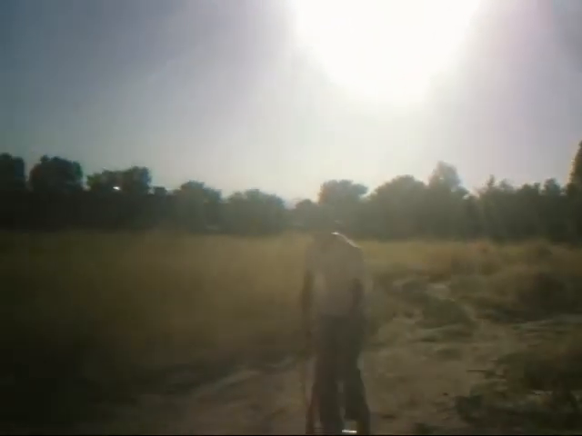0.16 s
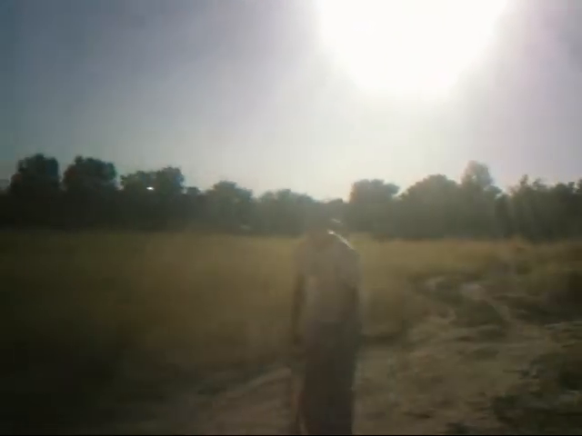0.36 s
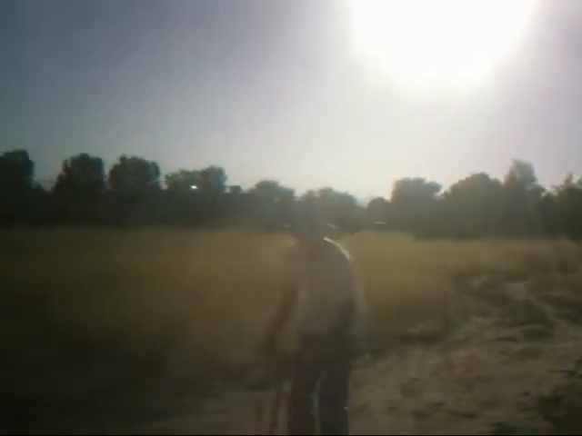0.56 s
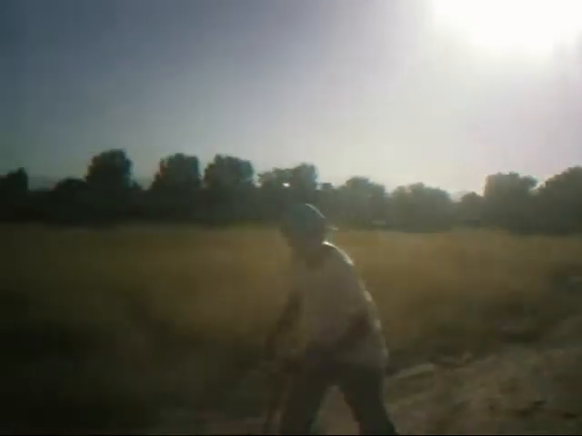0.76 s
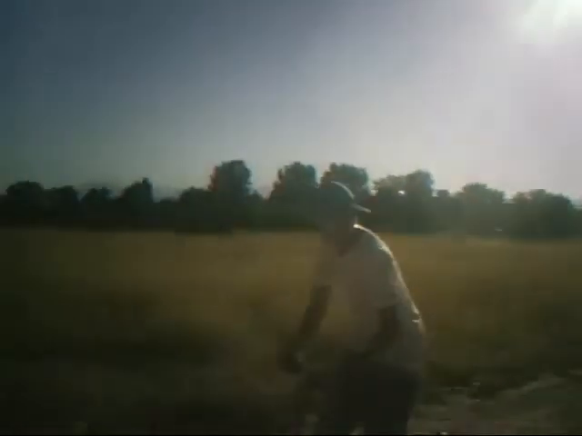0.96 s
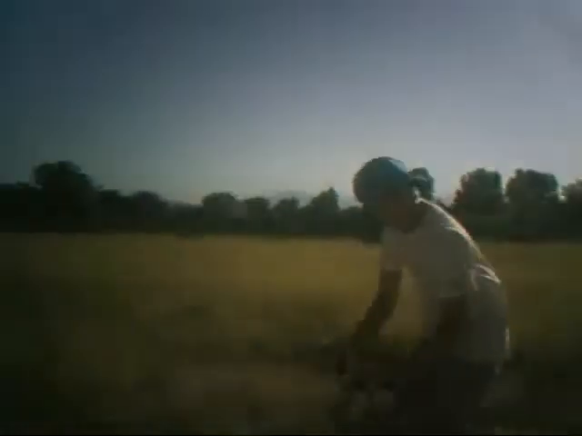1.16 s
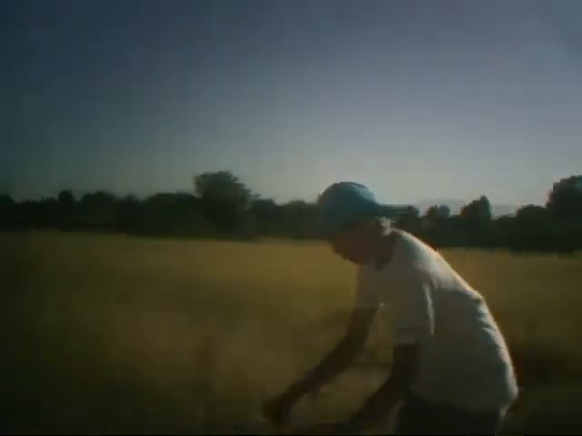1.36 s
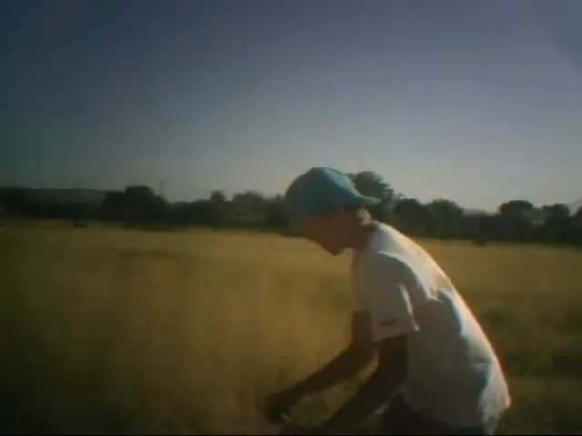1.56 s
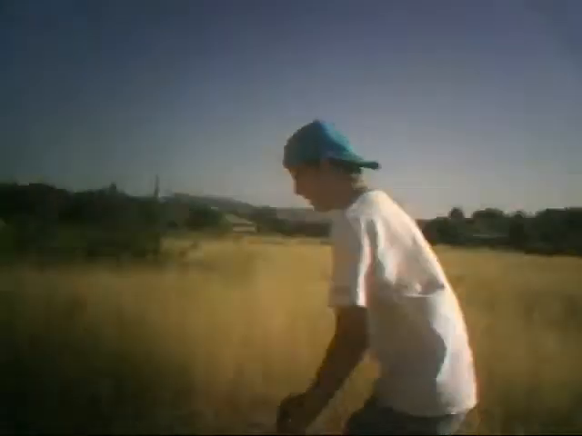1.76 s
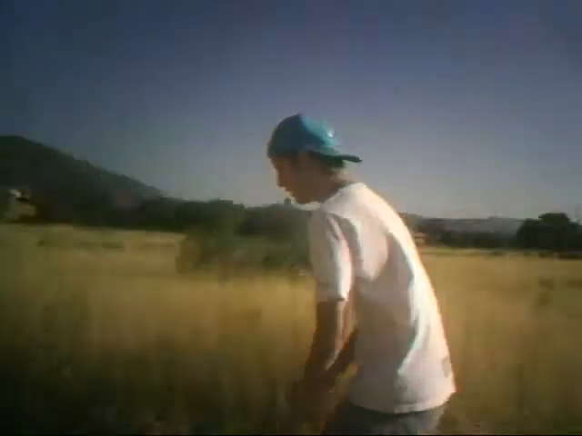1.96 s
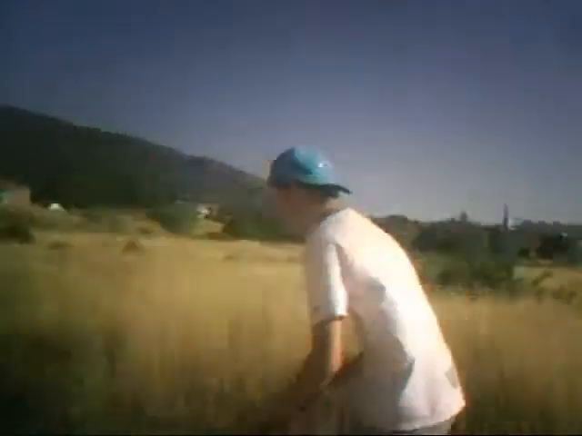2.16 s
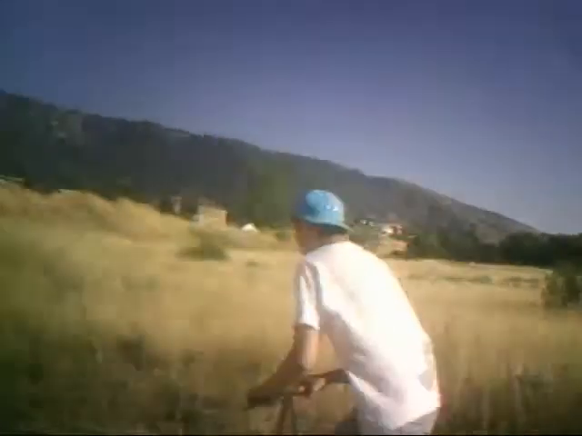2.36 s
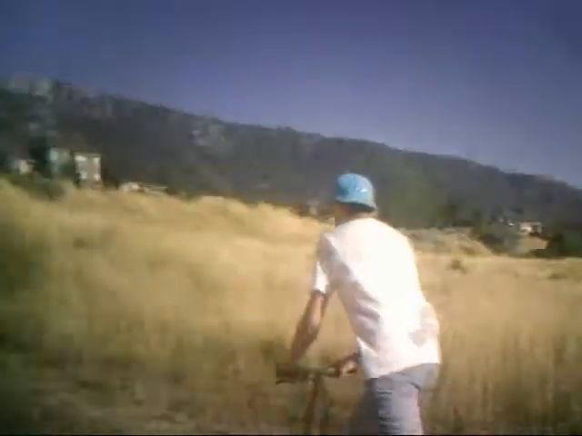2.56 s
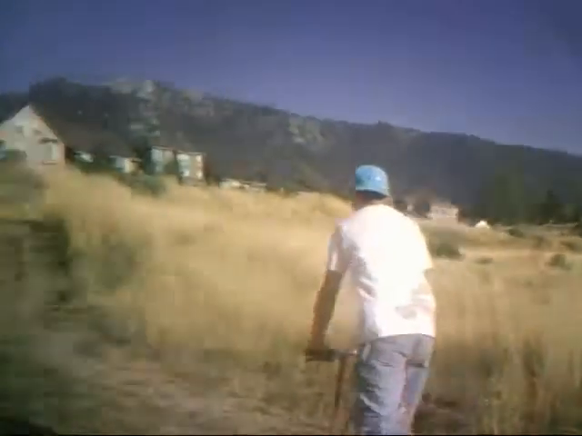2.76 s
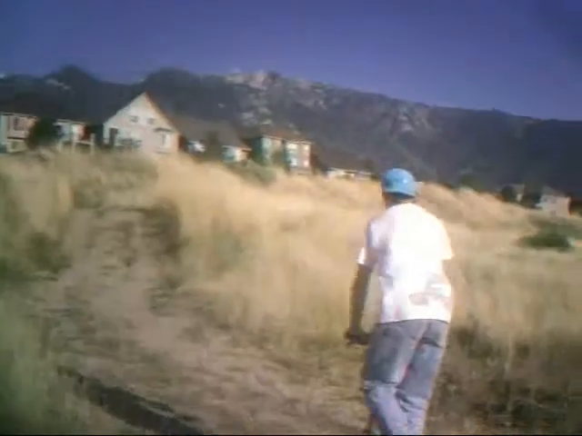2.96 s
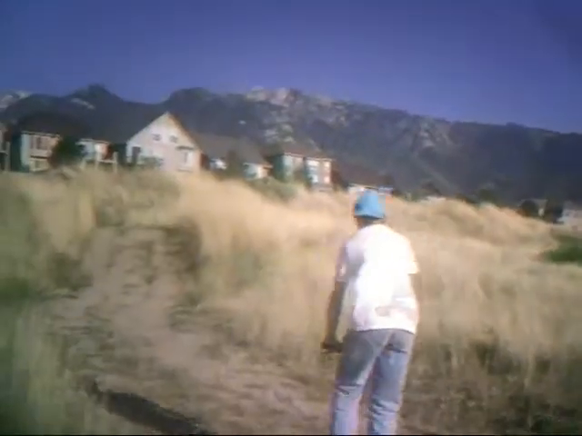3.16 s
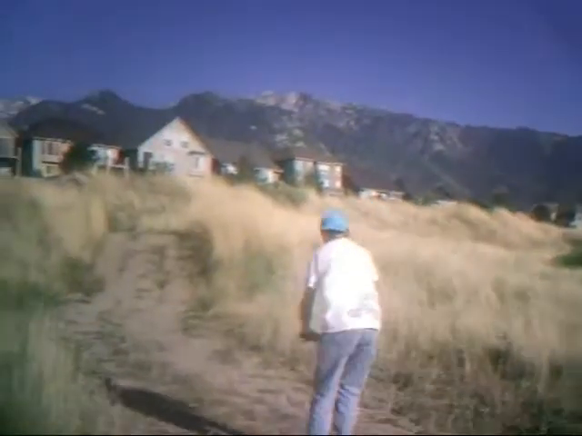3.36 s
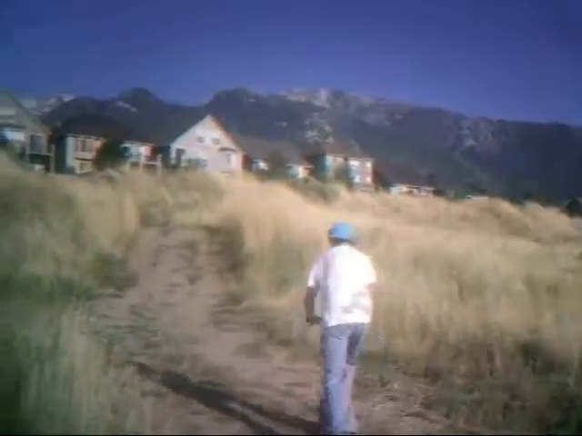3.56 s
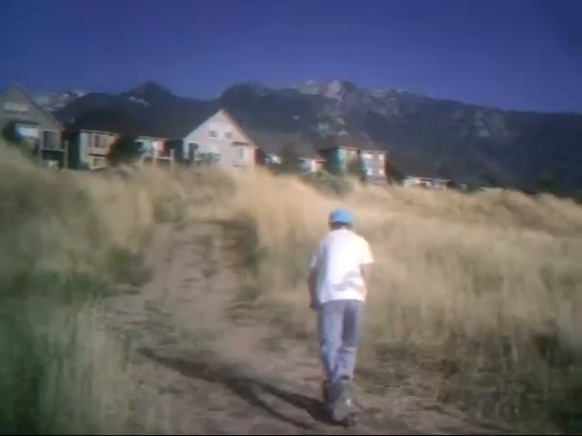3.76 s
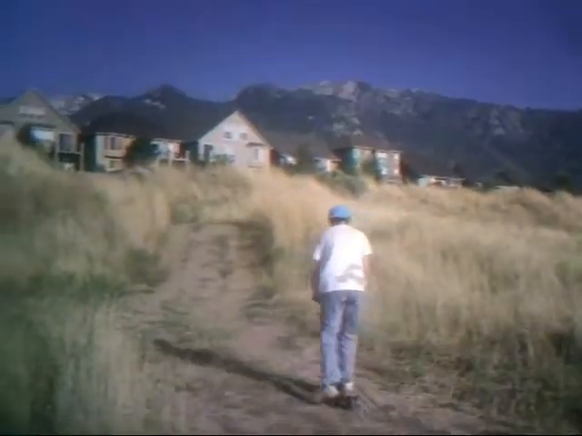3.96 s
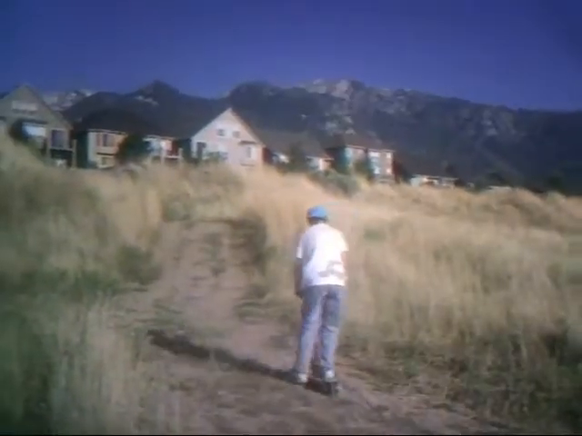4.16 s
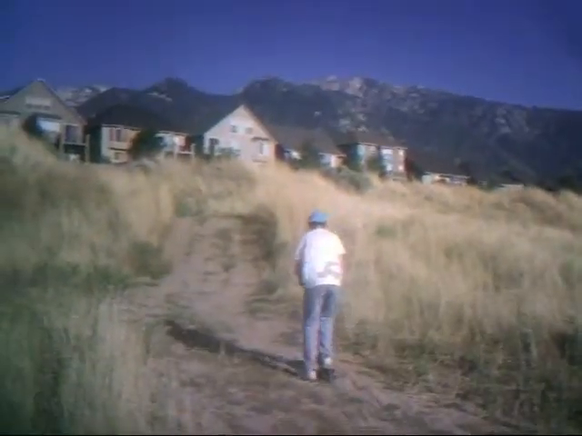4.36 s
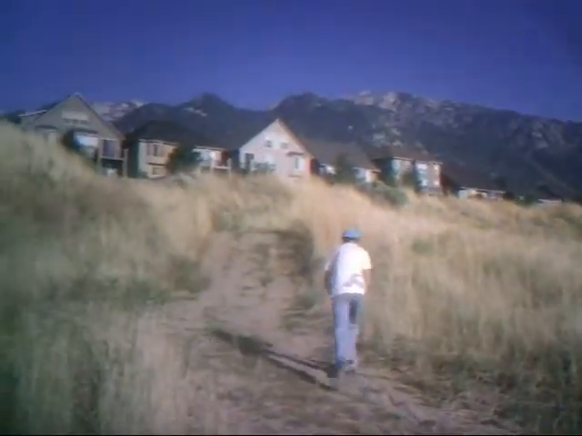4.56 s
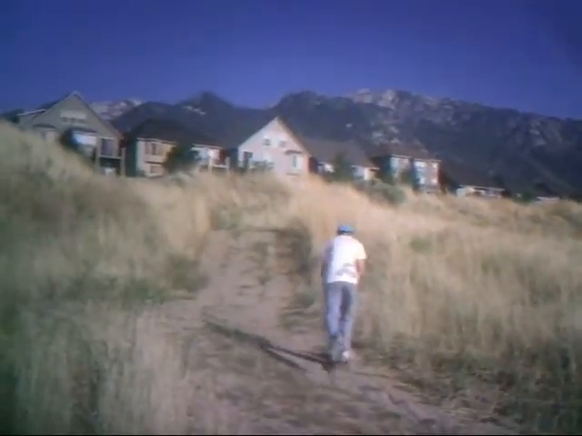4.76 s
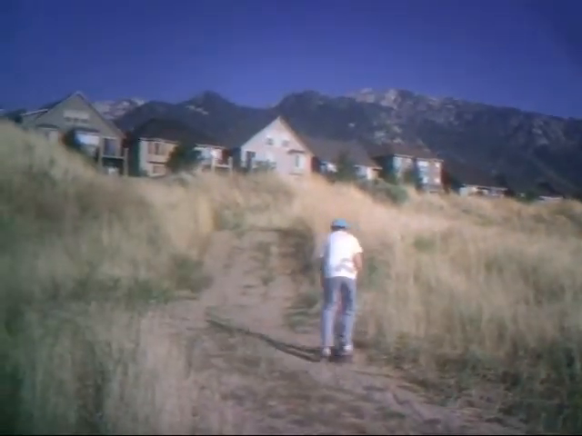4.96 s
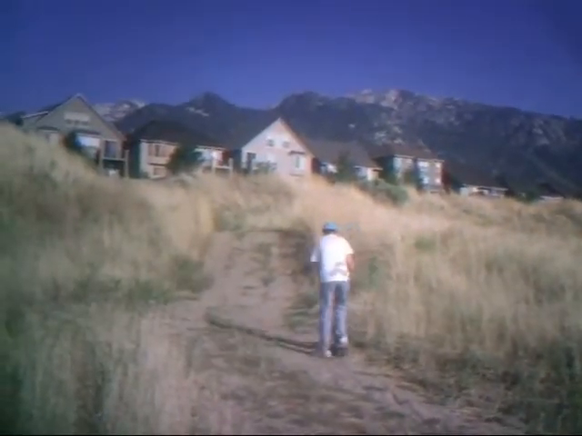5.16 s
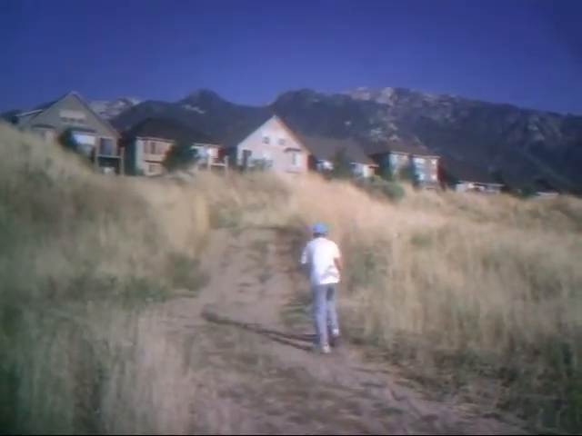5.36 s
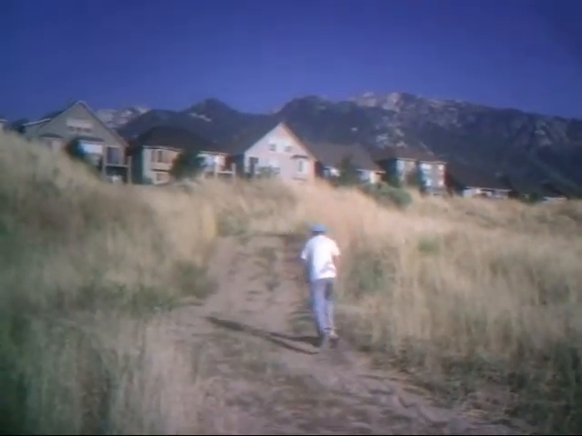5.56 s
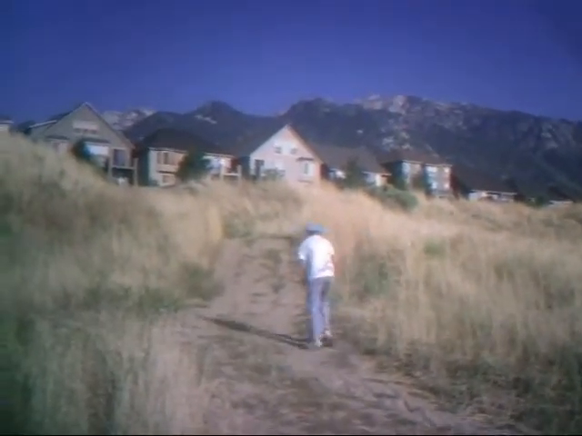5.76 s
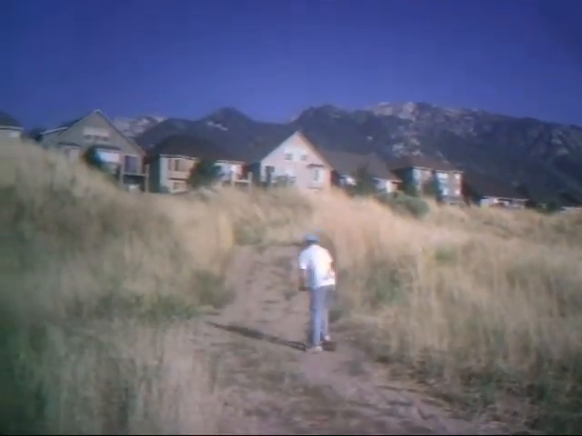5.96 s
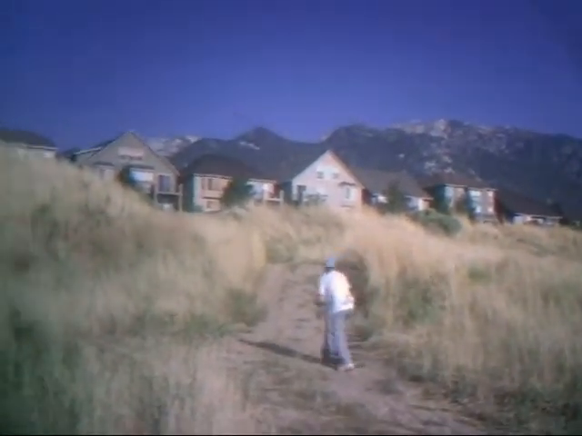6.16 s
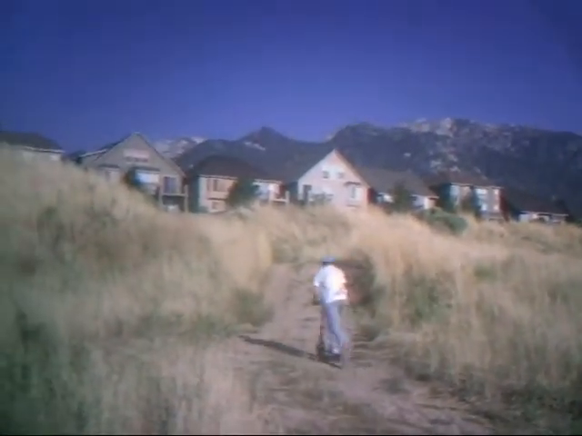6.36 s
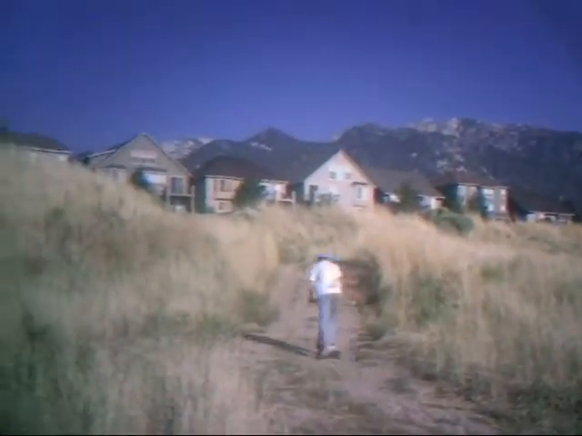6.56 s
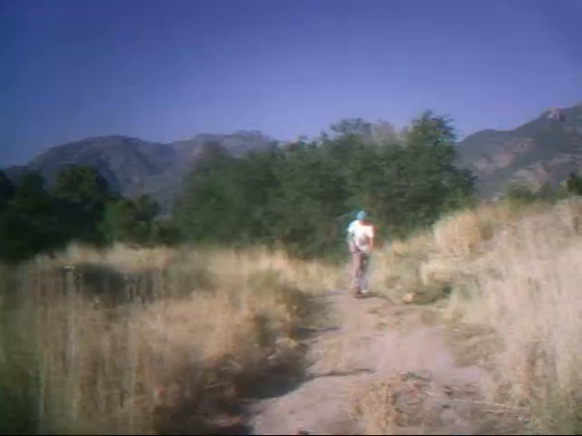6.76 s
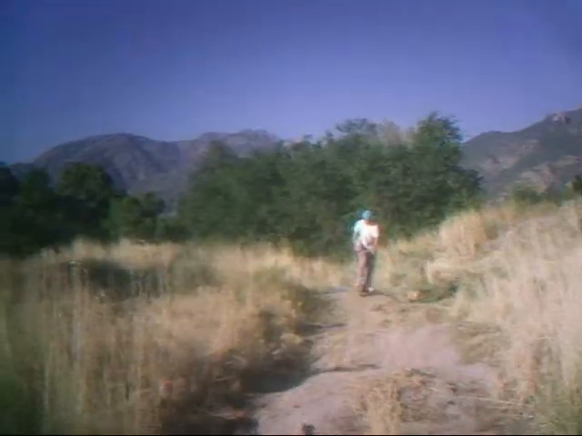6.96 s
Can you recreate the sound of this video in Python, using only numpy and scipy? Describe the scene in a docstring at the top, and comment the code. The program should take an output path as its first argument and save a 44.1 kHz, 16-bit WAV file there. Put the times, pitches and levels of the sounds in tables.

```python
"""A motor's hum comes near with wheel noise: a small electric scooter passes on dirt and labours up a slope.
The hum is a sum of harmonics of a sagging turning rate; filtered random impacts drum on deck and frame and
crunch grit; ruts excite decaying modes and chatter; filtered noise gives tyre drone, rumble and wind.
A coarse sample-and-hold roughens it all; near the end the ride cuts out, leaving hiss,
then a pop and a quiet field."""
import sys
import numpy as np
from scipy import signal
from scipy.fft import rfft, irfft
from scipy.io import wavfile
from scipy.ndimage import map_coordinates

SR = 44100
rng = np.random.default_rng(int(sys.argv[2]) if len(sys.argv) > 2 else 0)


def wav_out(sig):
    """Save sig, one row per channel (or a flat mono array), as 16-bit PCM at SR to the path in sys.argv[1]."""
    wavfile.write(sys.argv[1], SR, np.round(np.clip(np.atleast_2d(sig).T, -1, 1) * 32767).astype(np.int16))


N = 308700
TIME = np.arange(N) / SR

# common level of motor hum and tyre drone: t/s, level/dB
DRIVE_LEVEL = [(0, -6.5), (1.2, -.5), (2.9, 1.5), (4.7, 0), (6, -4.5), (6.7, -10)]
# distance of the scooter: t/s, distance (0 alongside, 1 some metres off, 2 far)
DISTANCE = [(0, 1.39), (.65, 1.125), (1.1, .12), (2.7, .12), (3.3, 0.81), (4.3, 1.18), (4.8, 1.71),
            (6.7, 2.02)]
# the scooter turns its back on the listener: heard from the side until the first time, far behind at the second
TURN_AWAY_S, FAR_BEHIND_S = 2.4, 4.58
DROPOUT_S, POP_S, RETURN_S = 6.731, 6.8055, 6.824


def amp(db):
    """Level in decibels to amplitude ratio."""
    return 10 ** (np.asarray(db) / 20)


def unit(x):
    """Normalises the mean power, for an rms of 1."""
    return x / np.sqrt(np.mean(x ** 2) + 1e-20)


def curves(rows):
    """Linear interpolation in time of each column of a table."""
    s, *columns = np.transpose(rows)
    return [np.interp(TIME, s, c) for c in columns]


def add(mix, s, sound):
    """Superposition: adds a sound to the mix from time s."""
    part = mix[round(s * SR):][:len(sound)]
    part += sound[:len(part)]


def colour(x, spectrum, size=4096):
    """Minimum-phase filtering: log gain and phase form a Hilbert pair, so the response is causal."""
    hz, db = np.transpose(spectrum)
    octave = np.log2(abs(np.fft.fftfreq(size, 1 / SR)) + 1)
    known = np.log2(hz + 1)
    # beyond the ends of the table the gain falls 60 dB per octave, to a floor of -90 dB
    outside = abs(octave - np.clip(octave, known[0], known[-1]))
    gain_db = np.maximum(np.interp(octave, known, db) - 60 * outside, -90)
    log_gain = np.log(amp(gain_db))
    taps = np.fft.ifft(np.exp(np.conj(signal.hilbert(log_gain)))).real
    return signal.oaconvolve(x, taps)[:len(x)]


def wander(hz):
    """Low-pass noise of rms 1: a slow random modulation that fades out above hz."""
    lowpass = 1 / (1 + (np.fft.rfftfreq(N, 1 / SR) / hz) ** 4)
    return unit(irfft(rfft(rng.standard_normal(N)) * lowpass, N))


def motor(waver_db=2.0, sway_rad=0.31):
    """Harmonic synthesis: orders of a turning rate that relaxes exponentially to a slower climbing speed."""
    # order (multiple of the turning rate), level/dB from the side, from behind, from far behind
    orders = [(2, -38, -41, -45), (3, -44.5, -36, -35.5), (4, -34.5, -33, -33.5), (5, -38.5, -35, -33.5),
              (6, -41.5, -45, -73), (7, -48, -43, -38), (8, -48, -76, -40), (9, -48, -51, -39.5),
              (10, -46, -54, -42.5), (12, -39, -62, -49)]
    flat_hz, climb_hz, climb_start_s, sag_s = 29.6, 19.5, 2.04, 4.5
    sag = np.exp(-np.maximum(TIME - climb_start_s, 0) / sag_s)
    speed_hz = climb_hz + (flat_hz - climb_hz) * sag
    angle = 2 * np.pi * np.cumsum(speed_hz) / SR
    view = np.interp(TIME, [TURN_AWAY_S, FAR_BEHIND_S], [0, 2])
    hum = np.zeros(N)
    for order, *views_db in orders:
        # staggered phases give an even hum rather than a throb
        stagger = np.pi * order ** 2 / 2
        # the bumpy ride shakes the level and phase of each order
        swell, drift = wander(hz=9), wander(hz=7)
        level_db = np.interp(view, np.arange(len(views_db)), views_db) + waver_db * swell
        hum += amp(level_db) * np.sin(order * angle + stagger + sway_rad * drift)
    return np.sqrt(2) * amp(curves(DRIVE_LEVEL)[0]) * hum


def stones(per_s, spread_db):
    """Poisson-like impacts of random sign, their levels spread exponentially in dB up to a limit."""
    size = amp(spread_db * np.minimum(rng.exponential(1, N), 3.5))
    struck = rng.random(N) < per_s / SR
    return unit(size * rng.choice([-1, 1], N) * struck)


def bumps(per_s, settle_s, depth):
    """Relaxation: each small bump raises the wheel load at once, then it decays; strong loads saturate."""
    kicks = rng.uniform(0.43, 1, N) * (rng.random(N) < per_s / SR)
    load = signal.lfilter([1], [1, -np.exp(-1 / (settle_s * SR))], kicks)
    return unit(1 + depth * np.tanh(load))


def glide(x, factor):
    """Time scaling: reading a sound at a changing rate moves all its frequencies by that factor."""
    return np.interp(np.cumsum(factor) % N, np.arange(N), x)


def heard_from_afar(x, spectra):
    """Spectral change with distance: blends three colours and lowers the pitch a little."""
    distance = np.clip(curves(DISTANCE)[0], 0, 2)
    pitch = 1.025 - 0.02 * distance  # factor alongside, and its fall for each step of distance
    heard = np.zeros(N)
    for k, spectrum in enumerate(spectra):
        share = np.maximum(1 - abs(distance - k), 0)
        heard += share * unit(glide(colour(x, spectrum), pitch))
    return heard


def patch_lift():
    """Stronger excitation on rough patches: extra dB on frame, deck and grit, with ramped edges."""
    # start t/s, length/s, extra level/dB of frame boom, deck drumming, grit
    patches = [(0.696, 0.045, 12, 3, 1.5), (0.811, 0.061, 17, 10, 8), (0.887, 0.055, 11.5, 8, 4),
               (0.973, 0.073, 9.5, 0, 4), (1.552, .04, 6.5, 1, -0.5), (1.85, .04, 8, 3.5, 1),
               (2.397, 0.13, 11.5, 0, -0.5), (2.987, 0.19, 0, 1.5, 0), (3.474, 0.23, 4.5, -0.5, 2.5),
               (4.295, 0.313, 2.5, 1, 4), (4.967, 0.063, -1, -4, 3), (5.331, 0.11, 2.5, 1.5, 3.5),
               (6.14, .25, 5, 4, 1.5)]
    edge_s = 0.025
    lift = np.zeros((3, N))
    for start, length, *extra_db in patches:
        inside_s = np.minimum(TIME - start, start + length - TIME)
        lift += np.outer(extra_db, np.clip(.5 + inside_s / edge_s, 0, 1))
    return lift


def wheels(crunch_db=-3.0, crackle_db=-1, crackle_share=1.06, surge_db=.5, crackle_surge_db=1.3):
    """Impact excitation: stones drum on deck and frame and crunch under the tyres, clumped by shared bumps."""
    # drumming of the deck, a spectrum for each distance 0, 1, 2: f/Hz, level/dB
    deck_spectra = [
        [(290, -51.5), (500, -6.5), (595, 1.5), (680, -6), (758, 0), (899, -17), (999, -41), (1050, -52),
         (1360, -40), (2310, -120)],
        [(290, -32.5), (500, -10), (621, 6), (695, -6.5), (758, -2), (812, -13), (1050, -18), (1360, -8),
         (2310, -120)],
        [(290, -52.5), (500, 6), (840, -2.5), (925, -4.5), (1050, -25.5), (1360, -17.5), (2310, -120)],
    ]
    # boom of the frame: f/Hz, level/dB
    frame_spectrum = [(150, -18.5), (240, -10.5), (330, -2.5), (420, 1.5), (490, -0.5), (560, -3),
                      (700, -21.5)]
    # crunch of the grit, a spectrum for each distance: f/Hz, level/dB
    crunch_spectra = [
        [(590, -21), (1000, -7), (1300, -3), (1590, 0), (1740, -2.5), (2000, -12), (2600, -8), (4400, -120)],
        [(590, -17), (1000, -4.5), (1180, -4), (1340, 0), (1530, 2), (1710, -11), (1790, -23.5), (2000, -23),
         (2600, -14), (4400, -120)],
        [(590, -15.5), (1000, 1), (1080, -1.5), (1400, 3.5), (1590, -6), (1710, -16), (2000, -10.5),
         (2600, -44), (4400, -120)],
    ]
    # fine crackle of the grit, a spectrum for each distance: f/Hz, level/dB
    crackle_spectra = [
        [(1150, 0.5), (1950, -11), (2310, -9.5), (2550, -11), (2810, 1.5), (3120, -4.5), (3900, -15),
         (4100, -35), (5330, -62), (9020, -120)],
        [(1150, -58.5), (1950, -7.5), (2470, -1), (2830, -2), (3140, -9.5), (3470, -7), (3910, -15),
         (4100, -18.5), (5330, -72), (9020, -120)],
        [(1750, -14), (2200, 5.5), (2550, -4), (2800, -7.5), (3100, 5.5), (3500, -0.5), (4000, -4.5)],
    ]
    # grit before the trims above: t/s, crunch level/dB, crackle level/dB
    grit = [(0, -34, -39), (0.75, -28.5, -37.5), (1.6, -28, -35.0), (2.85, -27.5, -32), (3.5, -32, -39.5),
            (4.1, -33.5, -45), (4.8, -38, -48.5), (5.9, -39.5, -51), (6.35, -39.5, -50.5),
            (6.7, -46.5, -57)]
    # the wheels go light and the drumming lets up: t/s, half width to 1/e /s, dip/dB
    lulls = [(2.385, 0.026, 6.5), (2.6, 0.028, 4), (2.94, 0.043, 7)]

    load = bumps(per_s=60, settle_s=0.0079, depth=0.7)
    distance = curves(DISTANCE)[0]
    frame_lift, deck_lift, grit_lift = patch_lift()
    lull = sum(db * np.exp(-((TIME - s) / width) ** 2) for s, width, db in lulls)
    crunching, crackling = curves(grit)
    ground = wander(hz=28.5)  # the track is unevenly stony

    # level alongside, and its fall for each step of distance
    deck_level = amp(-21.5 - 12 * distance + deck_lift - lull)
    deck = deck_level * heard_from_afar(stones(per_s=3500, spread_db=0.8) * load, deck_spectra)
    frame_level = amp(-29.5 - 7 * distance + frame_lift)
    frame = frame_level * unit(colour(stones(per_s=3000, spread_db=0.3) * load, frame_spectrum))

    crunch_level = amp(crunch_db + crunching + grit_lift + surge_db * ground)
    crunch = crunch_level * heard_from_afar(stones(per_s=7000, spread_db=1.5) * load, crunch_spectra)
    # clods of loose grit burst on their own as a tyre crushes them
    clods = bumps(per_s=16, settle_s=0.004, depth=1.8)
    crackle_level = amp(crackle_db + crackling + crackle_share * grit_lift + crackle_surge_db * ground)
    bursts = stones(per_s=6000, spread_db=1.5) * load * clods
    crackle = crackle_level * heard_from_afar(bursts, crackle_spectra)
    return deck + frame + crunch + crackle


def tyres(drone_db=-42, behind_db=4):
    """Directional broadband noise: the tyres' low drone follows the hum level and is stronger from behind."""
    # f/Hz, level/dB
    drone_spectrum = [(30, -16), (70, -2.5), (120, 2.5), (200, 0.5), (300, -6), (500, -37)]
    behind = np.interp(TIME, [TURN_AWAY_S, (TURN_AWAY_S + FAR_BEHIND_S) / 2], [0, 1])
    level = amp(drone_db + curves(DRIVE_LEVEL)[0] + behind_db * behind)
    return level * unit(colour(rng.standard_normal(N), drone_spectrum))


def rattle(t, spectrum, t60):
    """Decaying noise, peak 1: a quick chatter of loose metal that loses 60 dB in t60 seconds."""
    sound = colour(rng.choice([-1, 1], len(t)) * amp(-60 * t / t60), spectrum)
    return sound / abs(sound).max()


def jolts(ring_db=-3.0, clatter_db=0, clack_db=1, detune=0.033):
    """Modal excitation: a rut or stone kicks the body's damped modes and sets loose parts chattering."""
    # ruts and stones: t/s, level/dB before the trims, treble against that level/dB
    blows = [(0.699, -14, -3.5), (0.817, -6, -21), (0.837, -6, -20), (0.854, -4, -10), (0.87, -1.5, -29),
             (0.998, -7, -12), (1.05, -4, -23), (1.354, -15, -15), (1.56, -2, -22), (1.853, -2, -11),
             (1.939, -15.5, -0.5), (1.972, -5.5, -31), (2.253, -8, -14), (2.418, -10, -14),
             (2.7, -7.5, -18), (2.988, -12, -22), (3.613, -14.5, -7), (3.694, -11.5, -17)]
    # modes of the body before detuning: f/Hz, relative level/dB, t60/s
    modes = [(360, -1, 0.052), (435, -1, 0.035), (607, 11, 0.0085), (799, -6, 0.026)]
    # chatter after a jolt: f/Hz, level/dB
    clatter_spectrum = [(700, 9.5), (1000, 4.5), (1400, 1.5), (2000, 1), (2800, -4.5), (3900, -27)]
    # loose parts clacking alone: t/s, level/dB before the trim
    clacks = [(4.37, -20.5), (4.472, -35), (4.978, -37), (5.515, -18)]
    # colour of a clack: f/Hz, level/dB
    clack_spectrum = [(400, -22), (650, -17.5), (830, 4), (1050, 5.5), (1400, 0), (1750, -19), (2200, -9),
                      (3200, -18.5), (4000, -21)]
    t, out = np.arange(SR // 8) / SR, np.zeros(N)
    for s, db, treble_db in blows:
        ring = np.zeros(len(t))
        for hz, mode_db, t60 in modes:
            mode_hz = hz * (1 + detune * rng.standard_normal())
            ring += amp(mode_db - 60 * t / t60) * np.sin(2 * np.pi * mode_hz * t + rng.random())
        ring *= 1 - np.exp(-t / 0.001)  # the tyre softens the blow
        add(out, s, amp(db + ring_db) * ring / abs(ring).max())
        add(out, s, amp(db + treble_db + clatter_db) * rattle(t, clatter_spectrum, t60=0.059))
    for s, db in clacks:
        add(out, s, amp(db + clack_db) * rattle(t, clack_spectrum, t60=0.029))
    return out


def rumble(thump_hz=60):
    """Low-frequency noise of wheels and wind, with short thumps as Gaussian-windowed tones."""
    # t/s, level/dB
    buffet = [(0, -45), (.8, -37), (2.5, -34), (4, -41), (5.8, -40), (6.3, -31), (6.7, -34)]
    # f/Hz, level/dB
    rumble_spectrum = [(8, -13), (25, -9), (55, -2), (85, -7), (150, -11.5), (300, -30)]
    # thumps of air and ground: t/s at the crest of the window, level/dB, half width to 1/e /s
    thumps = [(.86, -24, 0.039), (1.861, -18, 0.013), (2.611, -26, .02), (6.36, -17.5, 0.019)]
    out = amp(curves(buffet)[0]) * unit(colour(rng.standard_normal(N), rumble_spectrum))
    for s, db, width in thumps:
        # a phase wander of 1 rad rms roughens the tone
        swing = np.sin(2 * np.pi * thump_hz * (TIME - s) + wander(hz=29.7))
        out += np.sqrt(2) * amp(db) * np.exp(-((TIME - s) / width) ** 2) * swing
    return out


def field(level_db=-39.5, rise_s=0.12):
    """Ambient noise: faint outdoor air as filtered noise, fading up as the microphone wakes."""
    # f/Hz, level/dB
    air_spectrum = [(40, -7), (150, -3), (300, -8), (500, -10), (750, -16), (950, -10), (1200, -19),
                    (1500, -29), (2000, -31), (3000, -35), (4000, -37)]
    fade = np.clip((TIME - RETURN_S) / rise_s, 0, 1)
    return amp(level_db) * fade * unit(colour(rng.standard_normal(N), air_spectrum))


def scene():
    """Superposition of the sources: the ride until the dropout, then the quiet field."""
    ride = motor() + wheels() + tyres() + jolts() + rumble()
    return (ride * (TIME < DROPOUT_S) + field())[None]


def pop(height=1.32, width_s=.0013, sag=0.041, settle_s=0.042):
    """Switching transient: the input returns with a one-sided thump, then settles slowly from below."""
    u = np.maximum(TIME - POP_S, 0) / width_s
    late = np.maximum(TIME - RETURN_S, 0)
    thump = height * u * np.exp(-u)
    settling = sag * (1 - np.exp(-late / width_s)) * np.exp(-late / settle_s)
    return thump - settling


def record(dry, hiss_db=-68):
    """Sample-and-hold imaging: coarse steps mirror the sound into a gritty treble, then a band limit."""
    # tone of the output: f/Hz, level/dB
    output_tone = [(0, 0.5), (9000, 1.5), (10800, 2.5), (12300, 8.5), (13800, 1.5), (15000, 3),
                   (22000, -10)]
    sampler_hz, edge_hz, clock_jitter_s = 8000, 15600, 1.5e-5
    heard = dry[0] + pop() + amp(hiss_db) * rng.standard_normal(N)
    samples = np.clip(signal.resample(heard, N * sampler_hz // SR), -.78, .78)
    steps = signal.resample(np.repeat(samples, 12), N)  # each sample held for 12 finer ones
    # an unsteady sample clock smears the mirrored tones
    clock = TIME + clock_jitter_s * wander(hz=120)
    steps = map_coordinates(steps, [clock * SR], order=3)
    edge = signal.firwin(511, edge_hz, window=("kaiser", 9), fs=SR)
    return signal.oaconvolve(colour(steps, output_tone), edge, "same")[None]


dry = scene()
out = record(dry)
wav_out(out)
```